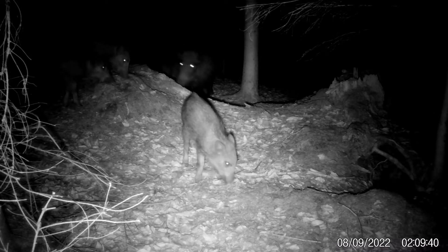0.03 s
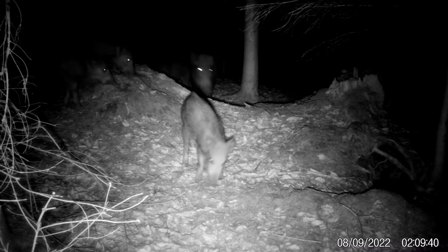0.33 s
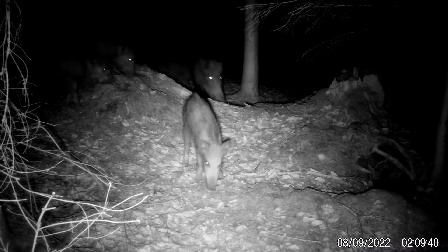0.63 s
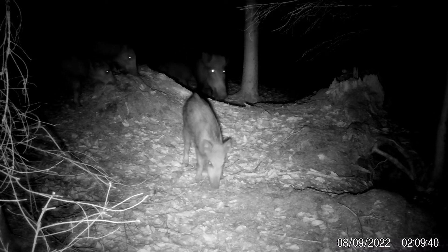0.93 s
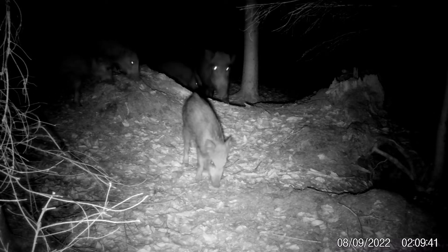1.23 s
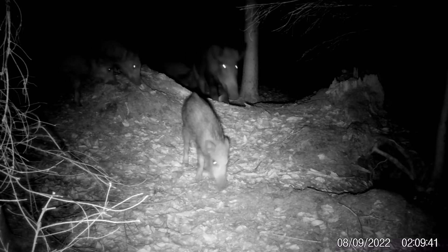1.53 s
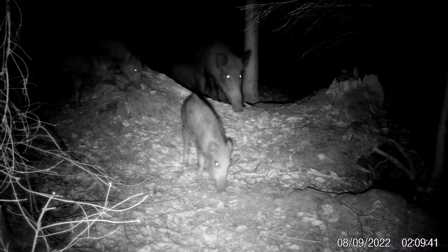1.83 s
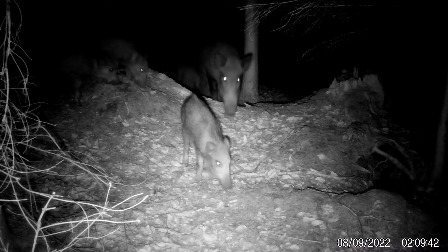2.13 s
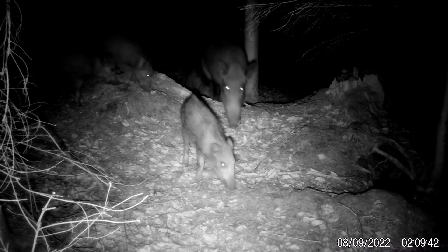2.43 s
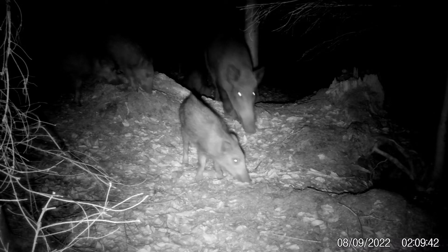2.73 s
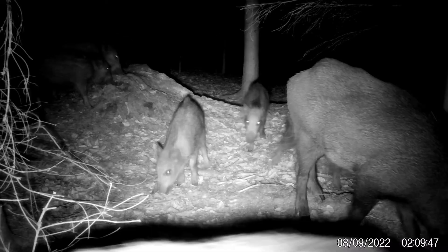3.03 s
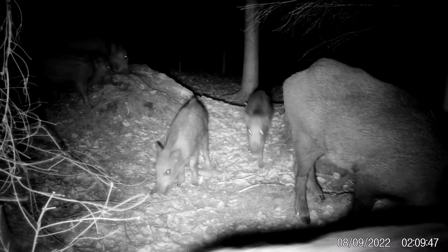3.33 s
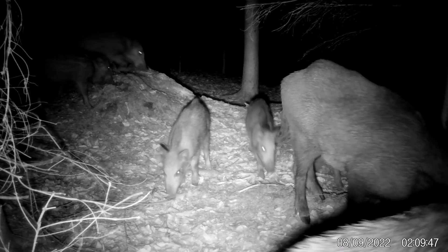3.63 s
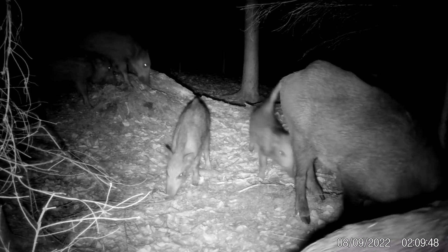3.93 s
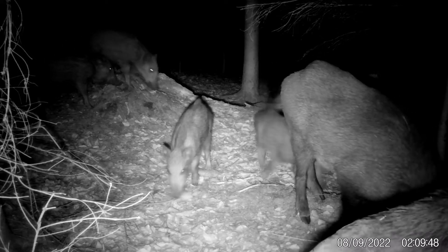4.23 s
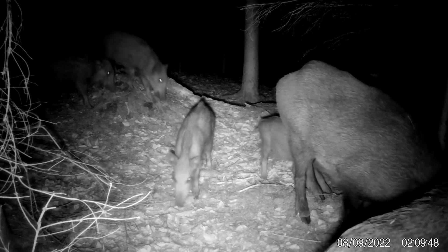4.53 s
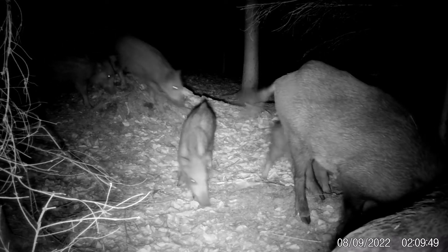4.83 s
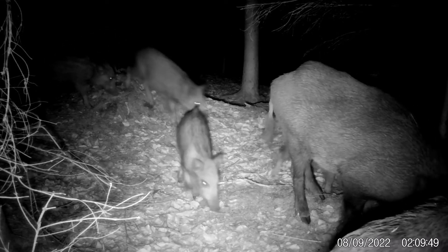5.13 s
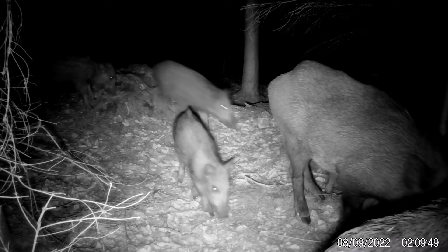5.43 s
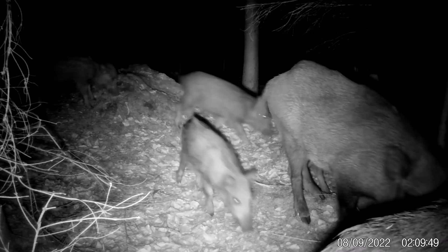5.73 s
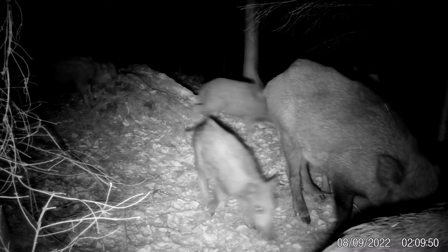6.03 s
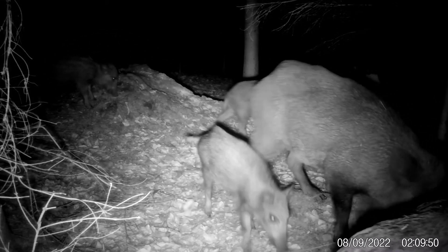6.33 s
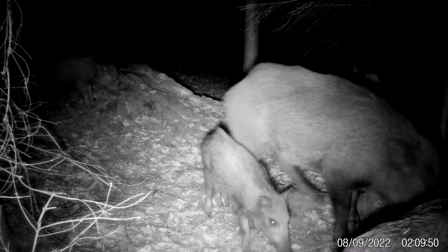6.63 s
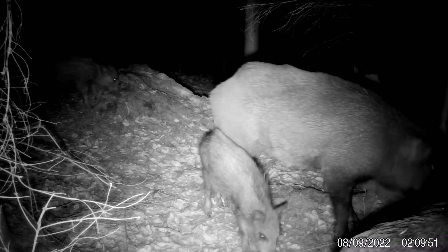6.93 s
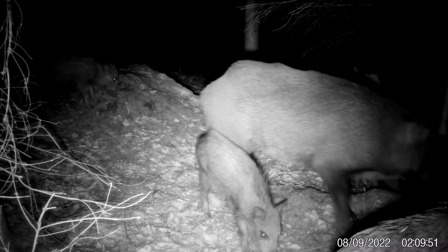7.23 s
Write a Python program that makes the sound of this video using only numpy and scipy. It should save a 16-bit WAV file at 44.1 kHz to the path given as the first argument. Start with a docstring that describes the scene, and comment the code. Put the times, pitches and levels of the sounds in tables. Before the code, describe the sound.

Wild boars root through dry leaves in a forest at night, over a steady microphone hiss. At first the rustling is distant, with small twig snaps and a few faint grunts. After a momentary dropout the animals are close: bright rustling, one loud twig crack and low, croaky grunts. A young boar adds thin, wavering squeals and then short rattling squeaks while the grunting continues and the rustling softens.

```python
"""A forest at night: wild boars root through dry leaves close to a trail camera that hisses steadily.
Snouts and hooves brush and crush the leaves, snap twigs and thud softly in the soil. The sow growls and
grunts: her throat flaps slowly, and each pulse rings in her chest, mouth and snout. A young boar gives
thin, wavering squeals and rattling squeaks. Once, the sound drops out for an instant."""
import sys
import numpy as np
from scipy import signal
from scipy.fft import rfft, irfft, next_fast_len
from scipy.io import wavfile
from scipy.ndimage import uniform_filter1d, map_coordinates

SR = 44100
rng = np.random.default_rng(int(sys.argv[2]) if len(sys.argv) > 2 else 0)


def persist_wave(psi):
    """Save psi, clipped to +-1, as 16-bit WAV."""
    counts = np.round(np.clip(psi, -1, 1) * 32767).astype(np.int16)
    wavfile.write(sys.argv[1], SR, np.atleast_2d(counts).T)


N = 325899
DIP_START_S, DIP_END_S = 2.838, 2.854  # the brief dropout; the herd is far before it and near after it


def rustling_leaves():
    """Leaves rustle far off, then brightly beside the camera, then softly under the feeding animals."""
    # sweeps of a snout or hoof: (time [s], length [s], rise [s], brushing [dB], crushing [dB])
    strokes = [(0.0, 0.033, .01, -43.5, -47), (0.184, 0.022, .008, -51.5, -58),
               (0.336, .012, 0.0062, -46, -49.5), (0.39, 0.22, .01, -55, -60.5),
               (0.575, .025, .01, -54.5, -55), (0.64, 0.13, .02, -59.5, -61.5),
               (0.848, .012, .002, -45.5, -51), (0.859, .035, 0.0099, -42.5, -48),
               (1.005, 0.048, .012, -53.5, -55), (1.093, 0.0091, .008, -46.5, -51),
               (1.153, 0.075, .007, -46.5, -52.5), (1.285, 0.047, 0.022, -51, -57),
               (2.165, .012, 0.013, -54.5, -72), (2.853, 0.12, .004, -39.5, -51.5),
               (2.935, 0.024, 0.018, -38.5, -41), (3.01, 0.17, 0.017, -44.5, -50),
               (3.094, 0.032, 0.014, -40, -45.5), (3.136, 0.056, .015, -42, -54),
               (3.213, 0.085, .02, -49.5, -56), (3.297, 0.058, .015, -45.5, -51),
               (3.392, 0.14, 0.033, -38.5, -44), (3.556, 0.13, 0.016, -47, -51),
               (3.74, .18, .03, -50.5, -56), (3.97, 0.13, 0.033, -48, -60),
               (4.144, 0.047, 0.059, -45.5, -52), (4.263, 0.016, 0.019, -41, -56.5),
               (4.317, 0.23, .02, -50, -60.5), (4.585, 0.12, .03, -55.5, -60.5),
               (4.84, .015, 0.013, -53.5, -70), (5.214, 0.02, .025, -51.5, -62),
               (5.506, 0.079, 0.047, -53.5, -71), (5.617, 0.39, .03, -59, -64),
               (5.921, 0.18, 0.023, -53, -63), (6.163, 0.079, 0.028, -49, -68),
               (6.28, 0.091, .02, -55, -59.5), (7.01, 0.11, 0.033, -54.5, -70),
               (7.193, 0.052, 0.047, -48, -56), (7.26, 0.053, .02, -56, -64)]
    # tone of far, near, soft and crushed leaves: (frequency [Hz], level [dB])
    far_tone = [(2060, -23.5), (3500, -12), (4070, -3), (6470, -2.5), (8440, -10.5), (9510, -11.5),
                (10600, -20.5), (12200, -54), (15800, -68), (22000, -120)]
    near_tone = [(2500, -28), (4000, -10.5), (4900, -6.5), (5600, 1.5), (6700, 1.5), (7500, 0), (8300, 0),
                 (9200, -6), (10100, -10.5), (11200, -19), (12200, -31), (15000, -65)]
    soft_tone = [(2500, -57), (4200, -11.5), (5100, 2), (5700, 5.5), (6600, 3), (7500, 0.5), (8400, -3),
                 (9300, -12.5), (10700, -19), (12200, -31), (15000, -69)]
    crushed_tone = [(150, -16), (500, -10.5), (1200, -4), (2200, 0.5), (3800, 0.5), (5000, 1.5),
                    (7000, -17.5)]
    far = coloured(crackle(per_second=3000, spread_db=5.5, blur=0.66), far_tone)
    near = coloured(crackle(per_second=1500, spread_db=2, blur=0.68), near_tone)
    soft = coloured(crackle(per_second=1500, spread_db=5, blur=0.72), soft_tone)
    crushed = coloured(crackle(per_second=1200, spread_db=4, blur=0.74), crushed_tone)
    t = clock(N)
    softness = np.interp(t, [3.55, 3.8], [0, 1])
    brushed = np.where(t < DIP_START_S, far, np.sqrt(1 - softness) * near + np.sqrt(softness) * soft)
    clumps = amp(1.6 * wobble(110))  # leaves give way in small clumps
    s, length, rise, brush_db, crush_db = np.transpose(strokes)
    # between strokes the herd keeps shuffling quietly
    brush = swells(zip(s, length, rise, brush_db), fade_s=0.041, sag_db=1.5, far_db=-65, near_db=-62)
    crush = swells(zip(s, length, rise, crush_db), fade_s=0.041, sag_db=1.5, far_db=-70.5, near_db=-66)
    return clumps * (amp(-1.44) * brush * brushed + amp(-2) * crush * crushed)


def twigs(break_s=0.0053, scatter_s=0.022, scatter_db=-24, dulling=0.78):
    """Each snap is a sharp break, a brief tearing of fibres and a faint scatter from the ground."""
    # twigs and dry leaves snapping: (time [s], level [dB], woody body against the crack [dB])
    snaps = [(0.1164, -40.5, 0), (0.1998, -34, -7), (0.338, -42, -15), (0.4604, -35.5, 0.5),
             (0.8669, -40, -15), (1.0306, -27.5, -6), (1.3244, -30.5, -9), (2.5735, -34.5, -29),
             (2.901, -24, -14), (2.9413, -18.5, -15), (2.9567, -30, -3.5), (2.9664, -28, -4),
             (3.036, -30, -19), (3.0815, -22.5, -8.5), (3.112, -31, -1), (3.4728, -27, -4.5),
             (3.4969, -6, -9.5), (3.6644, -29.5, -15), (3.715, -37, -23), (3.9659, -19.5, -19),
             (4.0133, -27.5, -31), (4.0632, -33.5, -27), (4.1807, -28, -11), (4.1844, -46, -2),
             (5.192, -35, -11), (5.5523, -34, -14), (6.1476, -35, -23), (6.346, -40, -22),
             (6.8748, -44, -11), (7.208, -27, -31)]
    # how a twig's bright crack and woody body ring: (frequency [Hz], width [Hz], level [dB])
    crack_tones = [(6020, 1260, 4), (6960, 1200, 5), (8270, 1850, 4), (10290, 1800, -4.5)]
    body_tones = [(1290, 390, 7.5), (2230, 370, 14), (3900, 940, 3)]
    out, t = np.zeros(N), clock(SR // 12)
    loudest = max(row[1] for row in snaps)
    fade = amp(-60 * t / break_s) + amp(scatter_db - 60 * t / scatter_s)
    for s, db, body_db in snaps:
        tear = rng.standard_normal(len(t)) * fade
        tear[0] = 3  # the break itself
        treble_db = max(dulling * (db - loudest), -16)  # faint snaps lie further off and sound duller
        crack = resonate(tear, crack_tones)
        crack = filtered(crack, lambda hz: amp(np.interp(hz, [7000, 10000], [0, treble_db])))
        body = resonate(tear, body_tones)
        snap = crack / np.linalg.norm(crack) + amp(body_db + 1.5) * body / np.linalg.norm(body)
        add(out, s + 0.00076, amp(db + 9) * snap)
    return out


def grunts(croak_ring_s=0.016):
    """The sow's vocal folds flap so slowly that each pulse rings chest, mouth and snout on its own."""
    # single strong throat pulses: (time [s], chest [dB], mouth [dB], snout [dB], ring time [s])
    strong_pulses = [(3.0081, -45, -56, -47, 0.021), (3.5717, -45, -45, -45.5, 0.026),
                     (4.1494, -63, -63, -56.5, 0.02), (4.2315, -44, -43, -59, 0.046),
                     (4.4949, -44, -49, -51.5, 0.033), (5.011, -73, -59.5, -66, 0.021),
                     (5.4501, -46.5, -44, -44, 0.043), (5.808, -46, -41.5, -44, 0.041),
                     (5.9941, -60, -60, -51, 0.01), (6.2798, -52, -47.5, -67, 0.039),
                     (6.313, -46.5, -43, -51.5, 0.03)]
    # slow runs of pulses: (start [s], end [s], rough rate [Hz], chest [dB], mouth [dB], snout [dB])
    croaks = [(0.198, 0.224, 38, -50, -57, -55), (1.666, 1.714, 39, -58, -65.5, -71),
              (3.54, 3.596, 34, -50.5, -61, -59), (3.6336, 3.669, 28, -49.5, -53, -56.5),
              (3.877, 3.9325, 36, -52.5, -60.5, -59), (4.354, 4.415, 31, -52.5, -52, -65),
              (4.591, 4.632, 23, -59, -65, -64), (5.5645, 5.664, 30, -51, -46, -51.5),
              (5.699, 5.778, 13, -54, -57.5, -63), (5.85, 5.924, 27.5, -74, -59.5, -55),
              (5.951, 5.97, 49, -56, -64, -53), (6.116, 6.234, 43, -55, -53.5, -59),
              (6.416, 6.5996, 49, -57.5, -58, -59), (6.731, 6.775, 29, -54, -68, -78),
              (7.134, 7.152, 50, -59, -75, -62.5)]
    # where her airway rings: (time [s], chest [Hz], mouth [Hz], tongue [Hz], tongue [dB], snout [Hz])
    airway = [(3.01, 234, 1150, 1800, -10, 3250), (3.57, 222, 1060, 1760, -19, 3190),
              (4.23, 353, 1210, 1830, -4, 3200), (4.5, 338, 1190, 1950, -14, 3200),
              (5.45, 266, 1190, 1776, 10, 3320), (5.565, 190, 1180, 1590, 5, 3400),
              (5.63, 169, 1134, 1390, 6.5, 3250), (5.7, 171, 1170, 1410, -8, 3370),
              (5.81, 273, 1143, 1790, -8.5, 3280), (5.9, 266, 1330, 1700, 5, 3830),
              (6.15, 238, 1095, 1460, -24, 2550), (6.28, 330, 1240, 1540, 3, 3220),
              (6.313, 338, 1225, 1670, -4, 3740), (6.46, 300, 1236, 1500, 2, 2855)]
    # the tones of each hollow: (frequency [x its own], level [dB], ring time [x the pulse's])
    chest_tones = [(1.0, 14, 1.38), (1.45, -23, .8)]
    mouth_tones = [(.57, -3.5, 0.9), (.88, -23, 1.4), (1.0, 5, 1.02)]
    snout_tones = [(.75, 3, 0.94), (.85, 0, 0.94), (1.0, 2, 1.3), (1.12, -2.5, 0.49)]
    out = np.zeros(N)
    times, *shape = np.transpose(airway)
    pulses = list(strong_pulses)
    for start, end, rate_hz, chest_db, mouth_db, snout_db in croaks:
        for s, db in pulse_run(start, end, rate_hz, taper_db=3):
            pulses.append((s, chest_db + db, mouth_db + db, snout_db + db, croak_ring_s))
    for s, chest_db, mouth_db, snout_db, ring_s in pulses:
        chest_hz, mouth_hz, tongue_hz, tongue_db, snout_hz = (np.interp(s, times, col) for col in shape)
        tongue_tone = (tongue_hz / mouth_hz, tongue_db, 1)
        chest = amp(chest_db - 3.7) * ringing(chest_tones, chest_hz, ring_s, rise_s=0.0028)
        mouth = amp(mouth_db) * ringing(mouth_tones + [tongue_tone], mouth_hz, ring_s, rise_s=0.00059)
        snout = amp(snout_db) * ringing(snout_tones, snout_hz, ring_s, rise_s=0.00032)
        add(out, s, chest + mouth + snout)
    soft_tissue = signal.butter(6, 4300, fs=SR, output="sos")  # swallows the treble
    return signal.sosfilt(soft_tissue, out)


def ringing(tones, hollow_hz, ring_s, rise_s, roughness=0.43):
    """One pulse sets the air in a hollow ringing with a few rough, fading tones."""
    t = clock(SR // 10)
    ring = np.zeros(len(t))
    for multiple, db, life in tones:
        flutter = unit(uniform_filter1d(rng.standard_normal(len(t)), size=80))
        hz = hollow_hz * multiple * (1 + 0.008 * rng.normal())
        fade = amp(db + rng.normal() - 60 * t / (ring_s * life))
        ring += fade * np.sin(2 * np.pi * hz * t) * (1 + roughness * flutter)
    ring *= 1 - np.exp(-t / rise_s)
    return ring / np.sqrt(np.mean(ring[:SR // 50] ** 2))  # strength 1 over the first 20 ms


def growl(rate_hz=36, jitter=0.25, decay=7.8, blur=0.45, rise_s=0.034):
    """The throat flutters unevenly: a low growl with a hoarse edge."""
    # growls that rise above the herd's faint muttering: (time [s], length [s], level [dB])
    growls = [(0.173, 0.1, -62.5), (1.29, .09, -60.5), (1.654, 0.064, -65.5), (1.93, 0.073, -64.5),
              (2.995, .045, -59.5), (3.12, 0.12, -63.5), (3.532, 0.18, -60), (3.86, 0.1, -57),
              (4.05, .06, -61.5), (4.208, .025, -60), (4.296, 0.13, -58.5), (4.473, .07, -57),
              (4.61, 0.036, -57), (4.88, 0.13, -59.5), (5.418, 0.025, -62), (5.603, 0.12, -63.5),
              (5.88, .13, -57.5), (6.12, .2, -58.5), (6.44, .17, -56.5), (6.74, 0.049, -65),
              (6.995, 0.074, -60.5), (7.122, 0.15, -62)]
    # tone of the low and the hoarse part: (frequency [Hz], level [dB])
    low_tone = [(35, -23), (80, -3), (140, -3), (250, -1), (380, -3.5), (550, -7.5), (900, -15.5),
                (2000, -50)]
    hoarse_tone = [(300, -17), (600, -2), (1200, -4), (1800, -0.5), (2400, -5.5), (3000, -8), (3800, -40),
                   (6000, -43)]
    cycle = np.cumsum(rate_hz * np.exp(jitter * wobble(25))) / SR % 1
    puffs = unit(blur + np.exp(-decay * cycle))
    low = coloured(puffs * rng.standard_normal(N), low_tone)
    hoarse = coloured(puffs * rng.standard_normal(N), hoarse_tone)
    events = [(s, length, rise_s, db) for s, length, db in growls]
    effort = swells(events, fade_s=0.035, sag_db=0.5, far_db=-70, near_db=-66.5)
    return effort * (low + amp(-3) * hoarse)


def hums(pitch_fall=0.21, octave_db=-12):
    """Short, soft grunts swell and fade while their pitch sinks."""
    # grunts with a clear note: (time [s], length [s], pitch [Hz], level [dB])
    notes = [(0.169, 0.049, 204, -56), (1.657, 0.087, 191.4, -58), (2.988, 0.085, 229, -48),
             (3.555, 0.049, 195, -51), (4.524, 0.046, 774, -49), (4.988, 0.053, 306, -53)]
    out = np.zeros(N)
    for s, length, hz, db in notes:
        progress = np.linspace(0, 1, int(length * SR))
        pitch = hz * (1 - pitch_fall * (progress - 0.5) + 0.04 * wobble(88)[:len(progress)])
        phase = 2 * np.pi * np.cumsum(pitch) / SR
        voice = np.sin(phase) + amp(octave_db) * np.sin(2 * phase)
        add(out, s, amp(db - 8) * unit(np.sin(np.pi * progress) * voice))
    return out


def squeals(jitter=0.0088):
    """The young boar's thin, whistling voice rings in its snout at about three times its pitch."""
    # one list of points for each squeal: (time [s], pitch [Hz], level [dB])
    calls = [
        [(4.146, 1990, -62), (4.16, 2190, -55), (4.168, 2440, -58)],
        [(4.168, 1590, -53), (4.19, 2045, -49.5), (4.205, 2100, -44.5), (4.22, 2110, -56), (4.232, 2010, -58)],
        [(4.293, 2090, -69), (4.316, 2075, -66), (4.342, 1845, -55), (4.358, 1950, -64)],
        [(4.335, 2220, -64), (4.348, 2240, -48), (4.362, 2380, -59)],
        [(4.365, 1530, -51), (4.385, 1837, -52), (4.4, 1987, -52), (4.414, 2003, -52), (4.436, 1860, -53),
         (4.467, 2016, -53), (4.485, 1963, -55), (4.5, 1995, -55), (4.525, 1780, -55), (4.548, 2040, -56),
         (4.57, 2090, -53)],
        [(4.822, 1584, -52), (4.84, 1870, -61), (4.854, 2110, -53), (4.872, 2136, -55), (4.886, 2160, -68)],
        [(5.003, 1930, -64), (5.017, 2220, -53), (5.028, 2340, -67)],
    ]
    # how the airway lifts or weakens the voice's tones: (frequency [Hz], level [dB])
    airway_tone = [(1500, -3.5), (2100, 0.5), (3000, -16), (4000, -12.5), (4600, -3), (5100, 0.5),
                   (5900, 6.5), (6400, -6), (7200, -9), (8200, -24), (9500, -30)]
    out, t = np.zeros(N), clock(N)
    waver, shimmer = 1 + jitter * wobble(300), amp(1.7 * wobble(160))
    airway_hz, airway_db = np.transpose(airway_tone)
    for call in calls:
        s, hz, db = np.transpose(call)
        on = (t > s[0]) & (t < s[-1])
        pitch = uniform_filter1d(np.interp(t[on], s, hz), size=400) * waver[on]
        phase = 2 * np.pi * np.cumsum(pitch) / SR
        voice = sum(amp(np.interp(k * pitch, airway_hz, airway_db)) * np.sin(k * phase)
                    for k in range(1, 5))
        out[on] += amp(np.interp(t[on], s, db) + 1.5) * shimmer[on] * voice
    return out


def rattling_squeaks(ring_hz=6200, rise_s=0.00063):
    """A squeak breaks into separate pulses, each ringing the young boar's snout with a high ping."""
    # runs of pings: (start [s], end [s], level [dB])
    squeaks = [(5.408, 5.4296, -35), (5.932, 5.972, -39.5), (6.417, 6.5004, -35.5), (6.541, 6.56, -30)]
    out, t = np.zeros(N), clock(SR // 50)
    swell = t / rise_s * np.exp(1 - t / rise_s)
    for start, end, run_db in squeaks:
        for s, db in pulse_run(start, end, rate_hz=49, taper_db=7.5):
            ping = np.sin(2 * np.pi * ring_hz * (1 + 0.031 * rng.normal()) * t)
            grit = 1 + 0.5 * unit(uniform_filter1d(rng.standard_normal(len(t)), size=30))
            add(out, s, amp(run_db + db) * swell * ping * grit)
    return out


def hooves(rise_s=0.018):
    """A hoof sinks into soft soil with a dull, low thud."""
    # footfalls: (time [s], level [dB])
    thuds = [(1.3, -70), (4.05, -63), (5.165, -61)]
    weight, t = np.zeros(N), clock(SR // 4)
    soil = coloured(rng.standard_normal(N), [(30, -16), (60, 8), (110, -7), (170, -10), (400, -33)])
    for s, db in thuds:
        add(weight, s, amp(db) * t / rise_s * np.exp(1 - t / rise_s))
    return weight * soil


def forest_echo(x, ring_s=0.15):
    """Trunks and ground scatter the sound back as a short echo."""
    t = clock(SR // 3)
    tail = rng.standard_normal(len(t)) * amp(-60 * t / ring_s) * (t > 0.003)
    return signal.fftconvolve(x, tail / np.linalg.norm(tail))[:N]


def hiss(level_db=-58.36):
    """The steady noise of the camera's microphone."""
    # tone of the hiss: (frequency [Hz], level [dB])
    hiss_tone = [(15, -35), (28, -6), (80, -7), (250, -4), (600, -2), (1200, -1.5), (2000, -5.5),
                 (3000, -11), (4000, -8), (5500, -2), (6600, -7.5), (8500, -16), (10000, -22), (12200, -35),
                 (15000, -68)]
    return amp(level_db) * coloured(rng.standard_normal(N), hiss_tone)


def crackle(per_second, spread_db, blur):
    """Tiny cracks of uneven size over a blur of countless smaller ones."""
    size = amp(spread_db * np.minimum(rng.exponential(size=N), 4))
    grains = (rng.random(N) < per_second / SR) * size * rng.choice([-1, 1], N)
    return unit(grains) + blur * rng.standard_normal(N)


def swells(events, fade_s, sag_db, far_db, near_db):
    """A volume curve: each event rises, sags a little and fades to the far or near herd's quiet level."""
    t = clock(N)
    gain = amp(np.where(t < DIP_START_S, far_db, near_db))
    for s, length, rise_s, db in events:
        rise = np.exp(np.minimum(t - s, 0) / rise_s)
        hold = amp(db - sag_db * (np.clip((t - s) / length, 0, 1) - 0.5))
        fall = np.exp(-np.maximum(t - s - length, 0) / fade_s)
        gain = np.maximum(gain, rise * hold * fall)
    return gain


def pulse_run(start, end, rate_hz, taper_db, scatter_db=3):
    """Evenly spaced pulses that tend to be weaker at both ends: (time [s], level [dB])."""
    gaps = max(round((end - start) * rate_hz), 1)
    progress = np.linspace(0, 1, gaps + 1)
    levels = scatter_db * rng.standard_normal(gaps + 1) - taper_db * (2 * progress - 1) ** 2
    return zip(start + progress * (end - start), levels)


def amp(db):
    """Turn decibels into a volume factor."""
    return 10 ** (np.asarray(db) / 20)


def unit(x):
    """Scale to an average strength (rms) of 1."""
    return x / np.sqrt(np.mean(x ** 2) + 1e-20)


def clock(count):
    """The time in seconds of each sample."""
    return np.arange(count) / SR


def wobble(rate):
    """A smooth curve through `rate` random points a second."""
    return map_coordinates(rng.standard_normal(int(N * rate / SR) + 4), [clock(N) * rate])


def filtered(x, response):
    """Turn each frequency in x up or down by response(frequency)."""
    size = next_fast_len(len(x) + 8192)
    return irfft(rfft(x, size) * response(np.fft.rfftfreq(size, 1 / SR)), size)[:len(x)]


def coloured(x, tone):
    """Shape x by (frequency [Hz], level [dB]) points, at strength 1."""
    f, db = np.transpose(tone)
    return unit(filtered(x, lambda hz: amp(np.interp(np.log(hz + 1), np.log(f), db))))


def resonate(x, tones):
    """Let x ring at each (frequency [Hz], width [Hz], level [dB])."""
    return filtered(x, lambda f: sum(
        (-1) ** k * amp(db) * 1j * f * width / (hz * hz - f * f + 1j * f * width)
        for k, (hz, width, db) in enumerate(tones)))


def add(track, s, sound):
    """Mix a sound into a track at s seconds."""
    part = track[max(round(s * SR), 0):][:len(sound)]
    part += sound[:len(part)]


def scene():
    """Voices and snaps with a faint echo, over growls, thuds, rustle and hiss."""
    near = grunts() + hums() + squeals() + rattling_squeaks() + twigs()
    return (near + amp(-18.5) * forest_echo(near) + growl() + hooves() + rustling_leaves() + hiss())[None]


def record(dry, top_hz=15700):
    """The sound drops out for an instant; the camera cuts the highest treble, leaving a faint fizz."""
    t = clock(N)
    in_dip = (t > DIP_START_S) & (t < DIP_END_S)
    volume = uniform_filter1d(np.where(in_dip, amp(-27.5), 1), size=90)
    dull = filtered(dry[0] * volume, lambda hz: amp(np.interp(hz, [10300, 12000, 12800], [0, -7, -45])))
    fizz = amp(-85) * rng.standard_normal(N)
    return filtered(dull + fizz, lambda hz: hz < top_hz)[None]


dry = scene()
out = record(dry)
persist_wave(out)
```